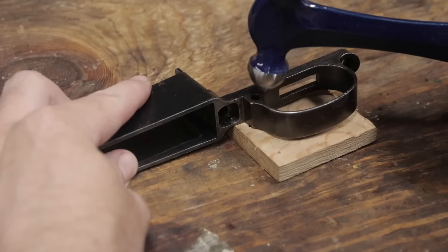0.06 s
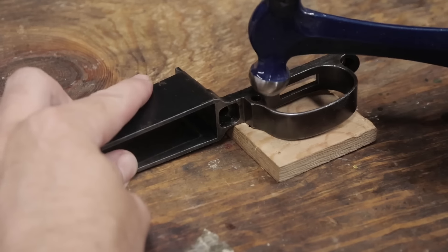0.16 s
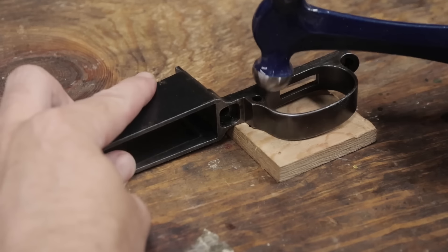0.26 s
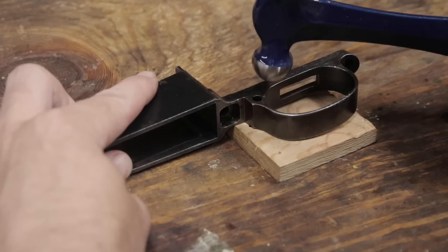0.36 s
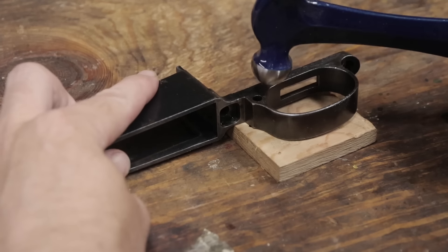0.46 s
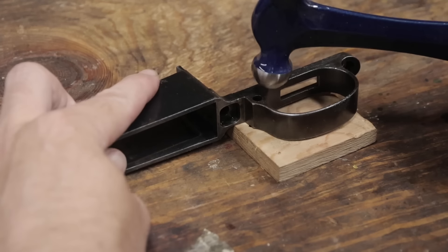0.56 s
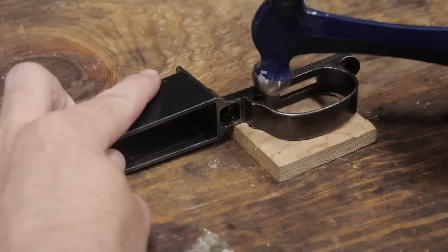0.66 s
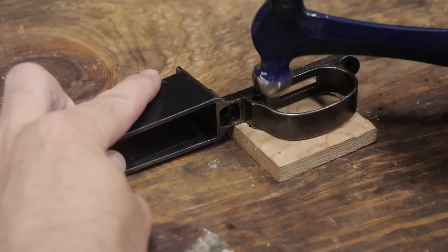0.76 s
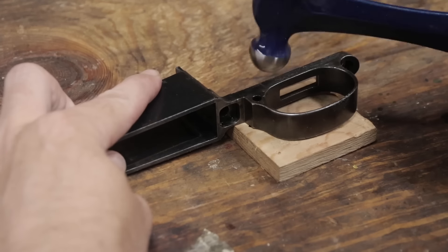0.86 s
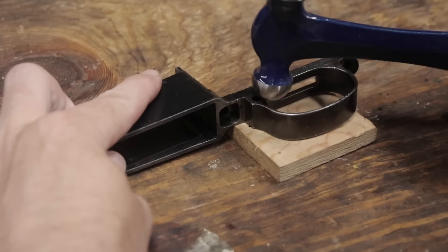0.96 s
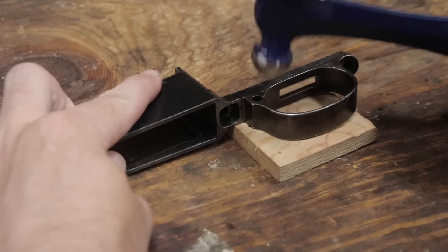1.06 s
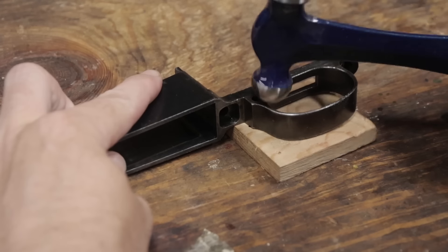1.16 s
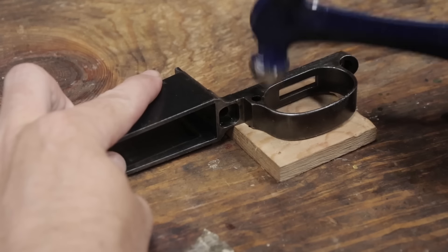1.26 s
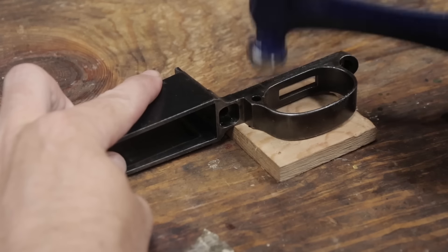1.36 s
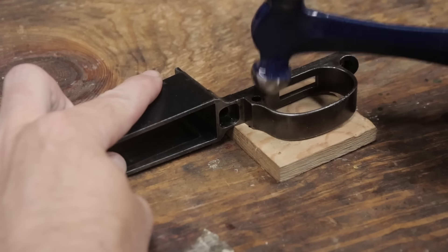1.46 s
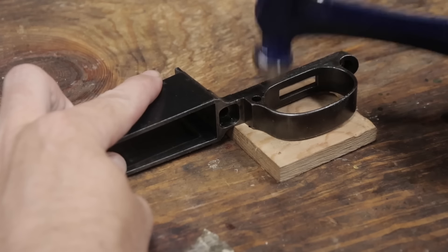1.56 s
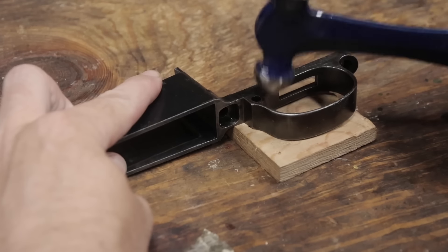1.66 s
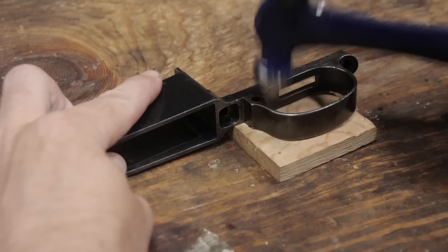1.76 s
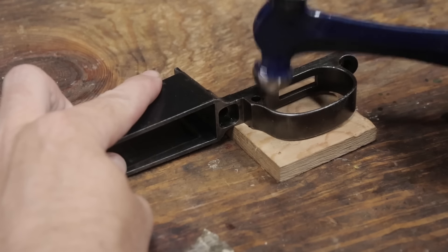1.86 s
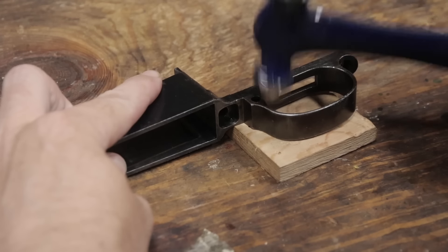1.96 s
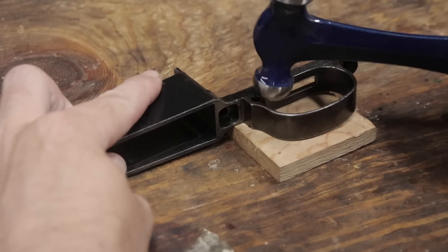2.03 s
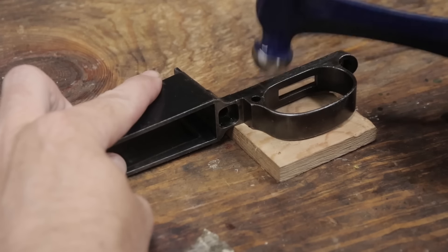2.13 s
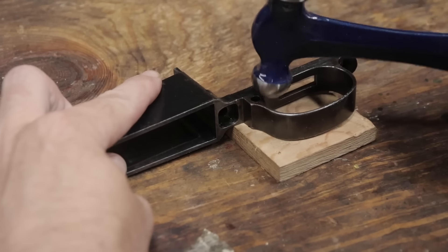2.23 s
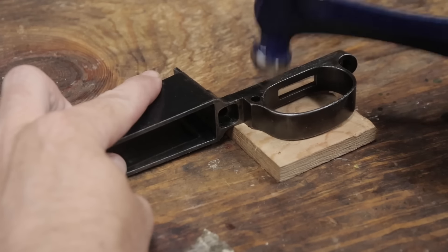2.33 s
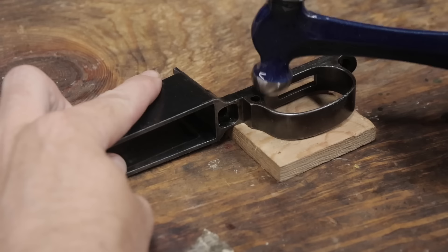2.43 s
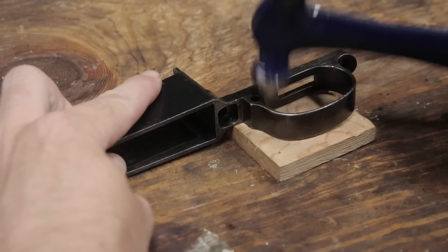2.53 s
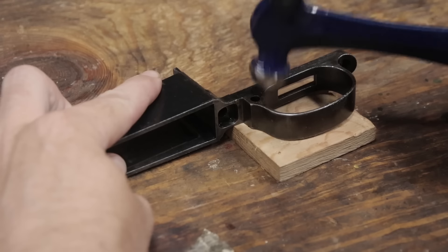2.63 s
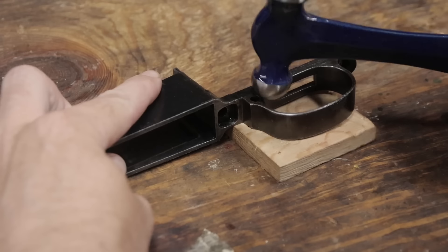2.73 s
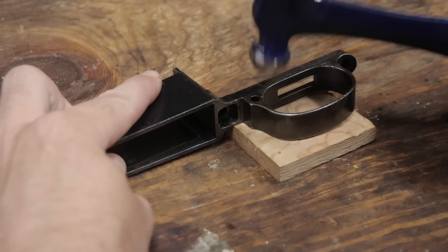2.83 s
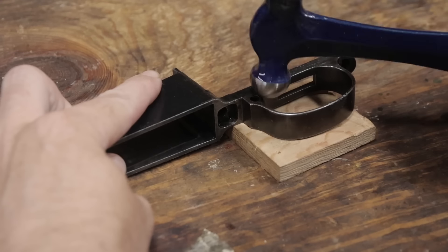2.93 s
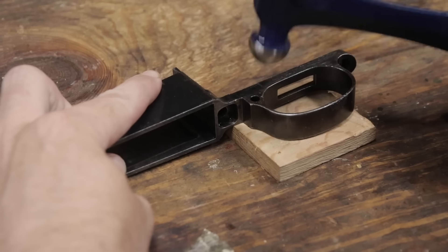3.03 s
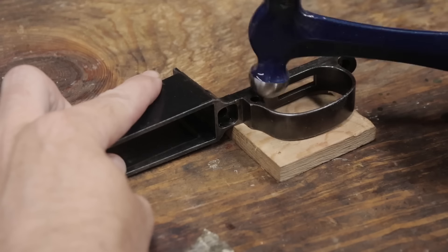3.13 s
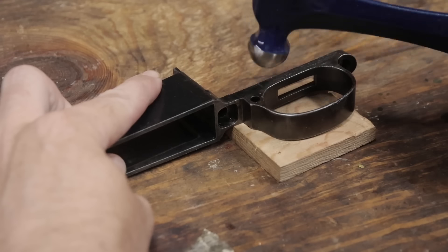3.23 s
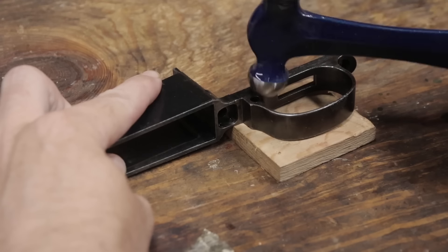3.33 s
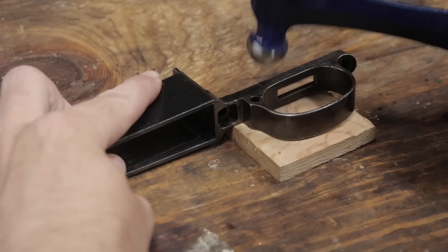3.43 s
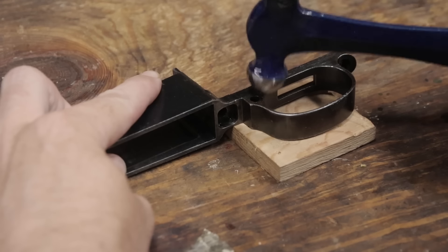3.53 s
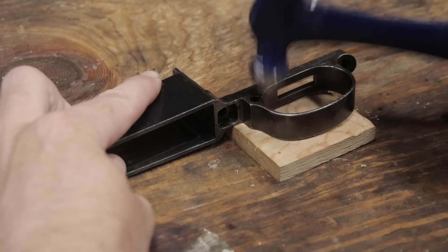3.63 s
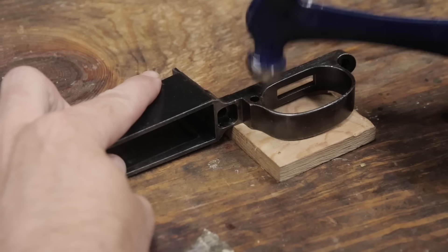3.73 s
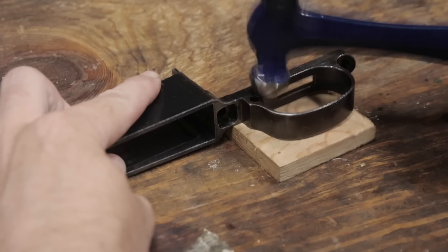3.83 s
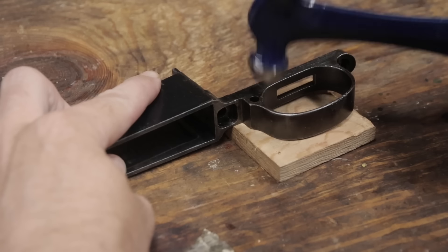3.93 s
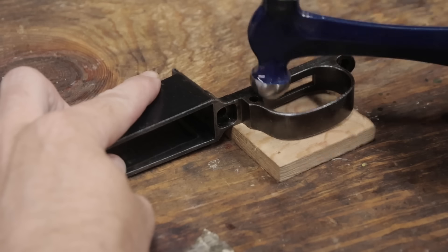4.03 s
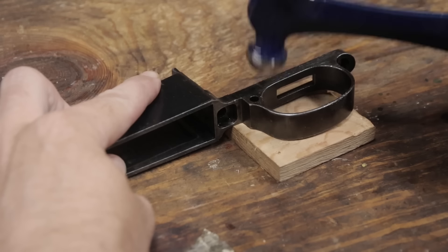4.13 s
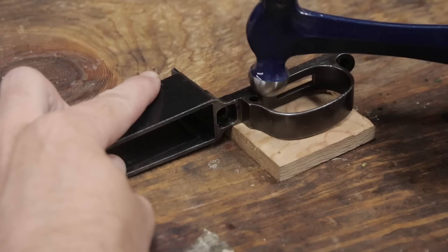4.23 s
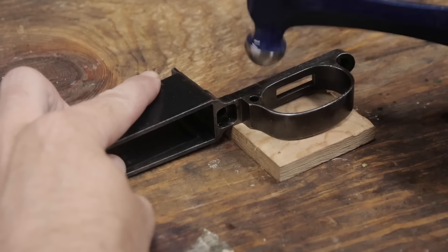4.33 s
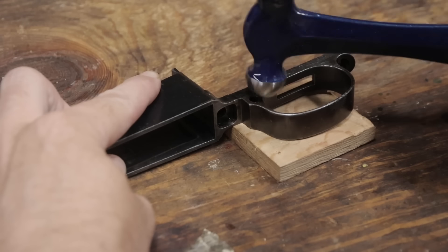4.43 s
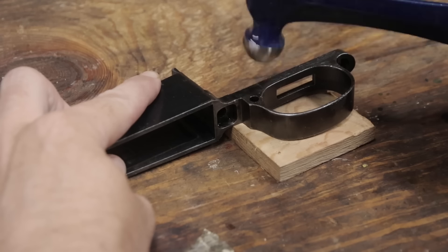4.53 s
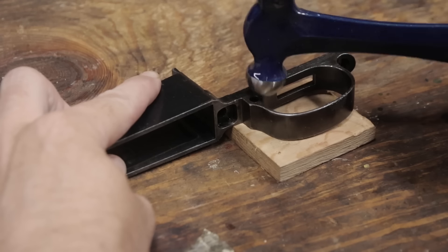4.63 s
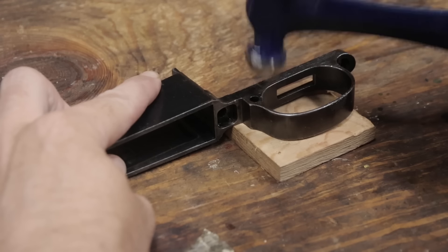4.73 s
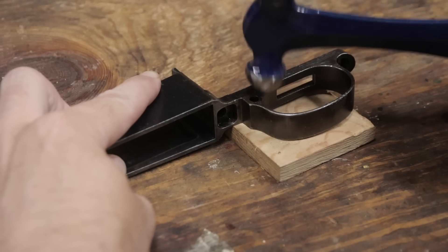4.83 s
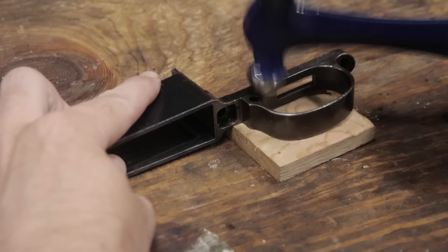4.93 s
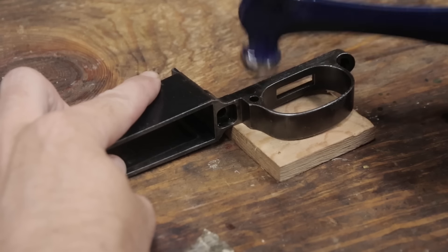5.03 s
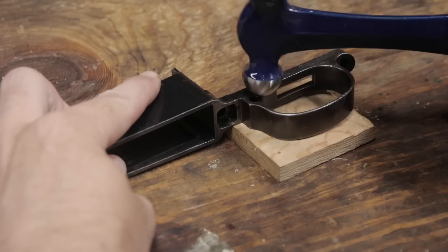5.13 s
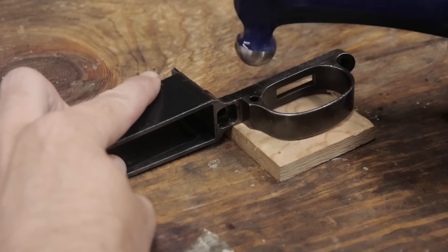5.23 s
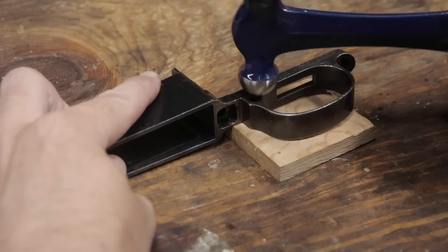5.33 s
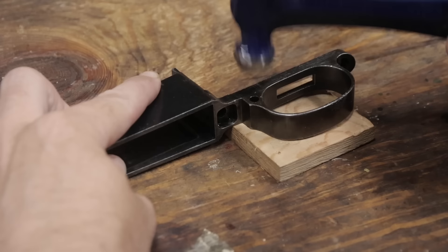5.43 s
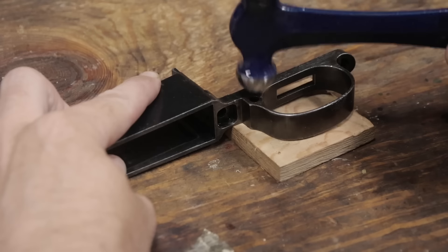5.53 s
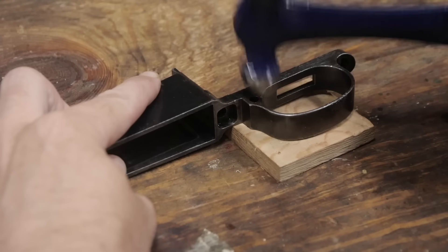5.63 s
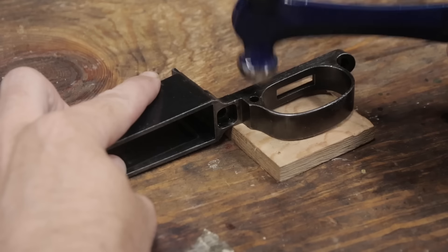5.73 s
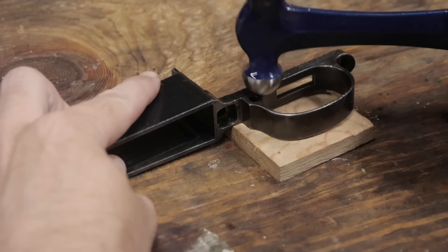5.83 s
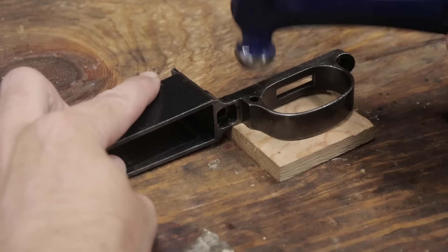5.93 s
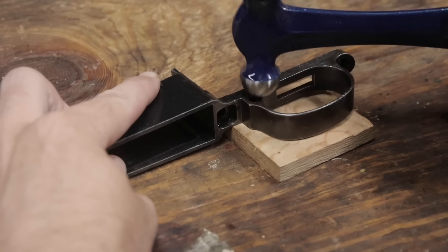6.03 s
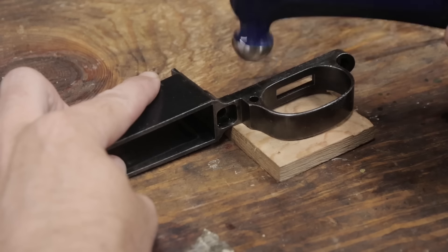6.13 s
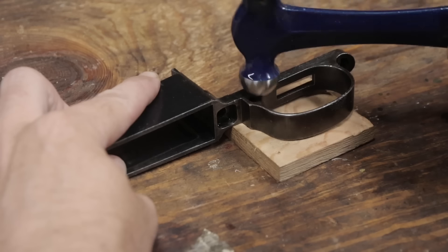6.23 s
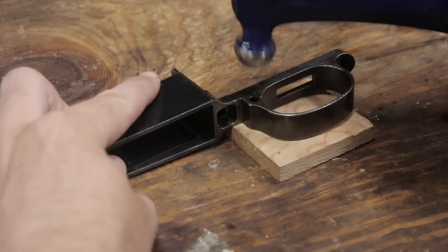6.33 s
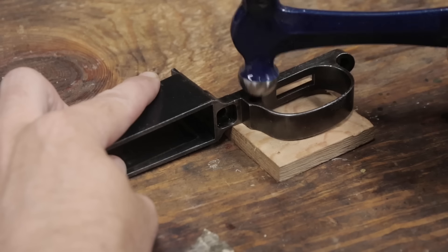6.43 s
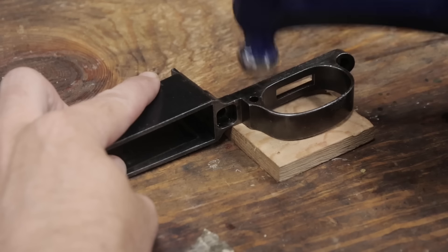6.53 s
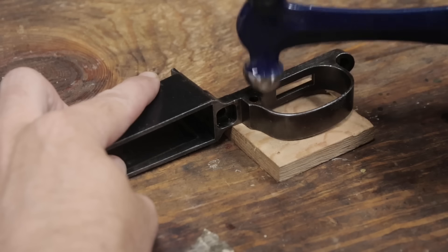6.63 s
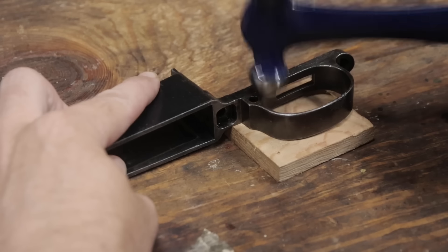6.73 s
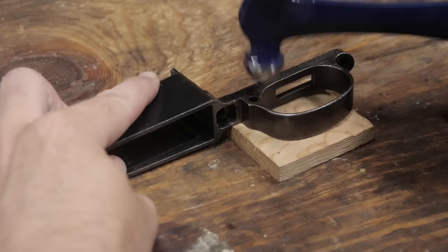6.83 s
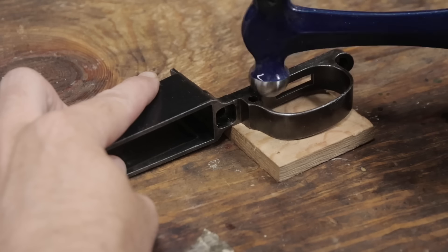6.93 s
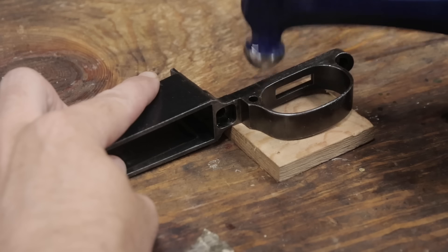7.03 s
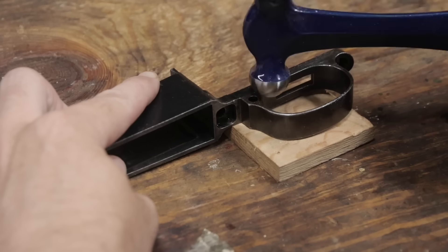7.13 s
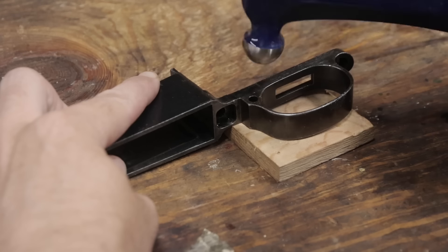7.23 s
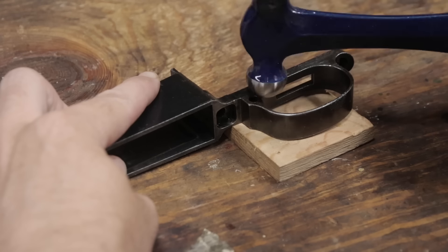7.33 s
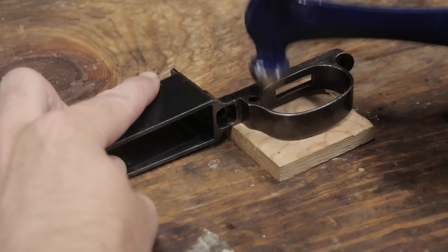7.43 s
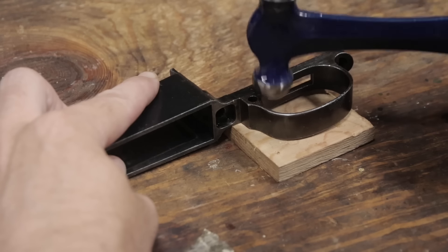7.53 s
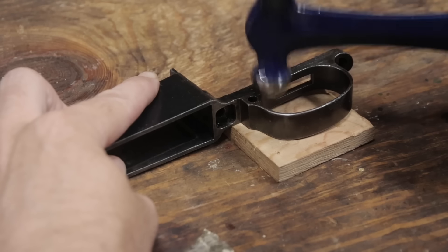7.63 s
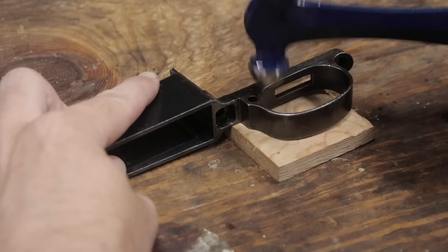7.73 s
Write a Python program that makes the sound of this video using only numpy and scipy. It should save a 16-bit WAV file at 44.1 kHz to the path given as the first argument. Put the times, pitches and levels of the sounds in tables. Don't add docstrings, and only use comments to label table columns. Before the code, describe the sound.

A small hammer taps a steel part on a wood block about five times a second, each hit a dry knock with bright metallic clack.

```python
import sys
import numpy as np
from scipy import signal
from scipy.fft import rfft, irfft
from scipy.io import wavfile
from scipy.ndimage import uniform_filter1d

SR = 44100
rng = np.random.default_rng(int(sys.argv[2]) if len(sys.argv) > 2 else 0)


def unload_wav(signal):
    wavfile.write(
        sys.argv[1],
        SR,
        np.round(np.clip(np.atleast_2d(signal).T, -1, 1) * 32767).astype(np.int16),
    )


def attenuation_scalar(level_db):
    decades = np.asarray(level_db, float) / 20
    return 10 ** decades


N = 343045


def unit(x):
    return x / np.sqrt(np.mean(x ** 2))


def noise():
    return rng.standard_normal(N)


def band(x, lo_hz, hi_hz):
    sos = signal.butter(2, [lo_hz, min(hi_hz, 0.45 * SR)], "band", fs=SR, output="sos")
    return signal.sosfilt(sos, x)


def train(times, sizes):
    out = np.zeros(N)
    index = np.clip((np.asarray(times) * SR).astype(int), 0, N - 1)
    np.add.at(out, index, sizes)
    return out


def place(times, sounds):
    out = np.zeros(N + SR)
    for at, sound in zip((times * SR).astype(int), sounds):
        out[at:at + len(sound)] += sound
    return out[:N]


def mode(force, hz, t60):
    radius = 1000 ** (-1 / (max(t60, 0.003) * SR))
    angle = 2 * np.pi * hz / SR
    return signal.lfilter([0, radius * np.sin(angle)], [1, -2 * radius * np.cos(angle), radius ** 2], force)


def fading(times, sizes, t60):
    return signal.lfilter([1], [1, -1000 ** (-1 / (t60 * SR))], train(times, sizes))


# (frequency [Hz], density [dB per Hz])
AIR_SPECTRUM = [(18, -48.5), (30, -10), (72, 4.5), (161, -21.5), (272, -17), (397, -22.5), (761, -29.5),
                (885, -27.5), (1080, -36.5), (1460, -35.5), (12000, -55), (15600, -86), (22000, -120)]
# (frequency [Hz], bandwidth [Hz], level [dB])
HUM = [(75, 8.7, -66), (855, 21, -82.5)]
AIR_DB = -58.5


def background(s):
    hz, db = np.transpose(AIR_SPECTRUM)
    f = np.maximum(np.fft.rfftfreq(N, 1 / SR), 1)
    colour = attenuation_scalar(np.interp(np.log(f), np.log(hz), db))
    air = attenuation_scalar(AIR_DB - 1.5) * unit(irfft(rfft(noise()) * colour, N))
    hum = sum(attenuation_scalar(db) * unit(band(noise(), c - width / 2, c + width / 2)) for c, width, db in HUM)
    duck = np.minimum(fading(s, np.ones(len(s)), 10.0), 1)
    return (air + hum) * attenuation_scalar(-7 * duck)


# (time [s], level [dB], length [s])
NUDGES = [
    (0.281, -56.5, 0.014),
    (0.295, -57, 0.01),
    (0.34, -64, 0.027),
    (0.779, -64, 0.008),
]


def nudges():
    t = np.arange(SR) / SR
    push = sum(attenuation_scalar(db) * np.exp(-((t - s) / width) ** 2) for s, db, width in NUDGES)
    push = push * rng.standard_normal(SR)
    rub = 0.17 * mode(push, 250, 0.023) + 0.084 * mode(push, 760, 0.017) + 0.0071 * mode(push, 1300, 0.019)
    return np.pad(band(rub, 120, 1500), (0, N - SR))


# (time [s], contact sharpness [dB], lean toward the thin
# wall [dB], hammer ring [dB])
TAPS = [(0.8041, -37.5, 4.5, -80), (1.0475, -39, 15.5, -60), (1.279, -4.5, 3.5, -51),
        (1.514, -17.5, 1.5, -53), (1.7076, -5, 2, -43.5), (1.8984, 0.5, -2.5, -43),
        (2.0926, -20.5, 5, -60), (2.2849, -0.5, -1.1, -49), (2.4801, 1, 1.8, -43.5),
        (2.6634, -12, -3.5, -61.5), (2.841, -0.3, 2.5, -46.5), (3.025, 3.5, 0, -44),
        (3.2161, 1, -3.5, -46.5), (3.4022, -3.5, -0.6, -58), (3.5916, 2.5, -4, -52.5),
        (3.7668, 1.2, -3, -47), (3.9529, 3, 1.3, -44.5), (4.148, 1, 0.5, -53),
        (4.3311, 1.5, 5.5, -48.5),
        (4.5136, 0.8, -1.5, -56), (4.6996, 4, 0.8, -49), (4.8807, 2.5, 3.5, -46),
             (5.0572, -0.5, 1, -61), (5.2336, 1.5, -2, -48.5), (5.4054, 4, 4.5, -63),
             (5.5852, 3, 6.5, -49.5), (5.764, 0, 6.5, -75), (5.9451, 0.6, 3, -62), (6.1274, 2.5, 6, -53),
             (6.317, 2.5, 7, -55), (6.4974, -8, 4, -57.5), (6.6845, -0.7, -5, -55),
             (6.8613, -6.5, 4, -52.5), (7.0437, -3, 4, -49.5), (7.233, -10.5, 0, -53),
             (7.4163, -0.5, 0.5, -52.5), (7.5789, -16.5, 2.5, -50), (7.7619, -23.5, 4, -54)]
# (time [s], level [dB])
EFFORT = [(0.8, -42), (1.05, -26), (1.45, -22), (1.7, -24), (2.7, -24), (3.25, -22), (3.8, -22), (4.3, -24),
          (4.6, -20.5), (5.06, -24), (5.5, -21.5), (5.85, -24), (6.65, -21), (6.87, -26), (7.35, -24.5),
          (7.62, -28)]
CLACK_DB, SPARKLE_DB, SLAP_DB = -30, -36, -16.5
SLAP_PER_SHARP, SLAP_PER_LEAN = 0.55, 0.25


def blows():
    s, sharp_db, lean_db, ring_db = np.transpose(TAPS)
    thump_db = np.interp(s, *np.transpose(EFFORT))
    slap_db = SLAP_DB + SLAP_PER_SHARP * sharp_db + SLAP_PER_LEAN * lean_db
    clack_db = CLACK_DB + sharp_db
    sparkle_db = SPARKLE_DB + sharp_db + lean_db
    return s, slap_db, thump_db, clack_db, sparkle_db, ring_db


# (frequency [Hz], signed swing [amplitude], t60 [s])
WOOD = [(68, 0.031, 0.041), (103, -0.016, 0.16), (123, -0.065, 0.078), (147, 0.02, 0.16),
        (181, -0.133, 0.119), (223, 0.049, 0.138), (242, 0.025, 0.16), (296, 0.058, 0.095),
        (333, 0.072, 0.089), (446, 0.06, 0.106), (475, -0.147, 0.015), (540, 0.07, 0.059),
        (677, -0.085, 0.16), (706, 0.193, 0.03), (823, 0.023, 0.098), (895, 0.056, 0.056),
        (1038, 0.064, 0.092), (1189, 0.095, 0.051), (1222, -0.076, 0.015), (1468, -0.061, 0.02),
        (1586, -0.012, 0.113), (1723, 0.088, 0.068), (1691, -0.098, 0.022), (2145, 0.028, 0.015),
        (2407, -0.025, 0.015), (2578, -0.013, 0.097), (3098, 0.014, 0.136), (3458, -0.026, 0.015)]
REBOUND_S, REBOUND_SHARE = 0.00582, -0.53


def wood(s, slap_db, thump_db):
    hz, swing, t60 = np.transpose(WOOD)[:, :, None]
    t = np.arange(SR // 8) / SR

    def ring(age):
        return swing * np.sin(2 * np.pi * hz * age) * 1000 ** (-age / t60)

    shapes = ring(t) + REBOUND_SHARE * ring(np.maximum(t - REBOUND_S, 0))
    knock_db = 1.01 * (thump_db + 24) + 0.15 * (slap_db + 21.5)
    scatter_db = 1.2 * rng.standard_normal((len(s), len(WOOD)))
    mode_db = np.where(hz.T < 400, thump_db[:, None] + 24.0, knock_db[:, None])
    knocks = attenuation_scalar(mode_db + scatter_db) @ shapes
    contact = np.hanning(9)
    knocks = signal.lfilter(contact / contact.sum(), [1], knocks)
    choked = knocks * np.exp(-(t / 0.042) ** 2)
    thud = knocks * np.exp(-t / 0.006)
    lag, size = rng.random((len(s), 2)).T
    bounce = place(s + 0.018 + 0.01 * lag, attenuation_scalar(-12.0) * size[:, None] * choked)
    slap = fading(s, attenuation_scalar(slap_db - 7.5), 0.026) * unit(band(noise(), 2440, 3780))
    shudder = fading(s + 0.0037, attenuation_scalar(knock_db - 29.5), 0.09) * unit(band(noise(), 286, 1224))
    return place(s, choked) + bounce + slap + shudder, place(s, thud) + slap + shudder


# (frequency [Hz], level [dB], t60 [s])
STEEL_LOW = [(2293, -3, .07), (2508, -3, .07), (2640, -4, .07), (2783, -4, .07), (3030, -4, .07),
             (3100, -1, .08), (3235, -2, .08), (3418, -2, .08), (3671, -6, .07), (3865, -8, .07),
             (4414, -9, .07), (4581, -9, .07), (4904, -9, .07), (5135, -8, .07), (5334, -8, .07),
             (5577, -6, .07), (5964, -6, .07), (6126, -9, .07), (6303, -12, .07)]
# (frequency [Hz], level [dB], t60 [s])
STEEL_HIGH = [(7650, -10, .07), (8263, -6, .07), (8780, 0, .07), (9232, -6, .06), (9377, -2, .08),
              (9566, -4, .09), (10034, -3, .08), (10368, -11, .12), (11057, -10, .12), (11590, -8, .07),
              (12419, -8, .09), (14911, -21, .06)]
MODES_DB = -9.5
HELD = 0.81


def steel(s, level_db, modes, crack_hz, crack_s, chatter_s):
    chatter = fading(s, attenuation_scalar(level_db), chatter_s) * noise() / np.sqrt(chatter_s * SR / 14)
    rings = sum(attenuation_scalar(db) * mode(chatter, hz, HELD * t60) for hz, db, t60 in modes)
    crack = fading(s, attenuation_scalar(level_db), crack_s) * unit(band(noise(), *crack_hz))
    return attenuation_scalar(MODES_DB) * rings + crack


RING_HZ, RING_T60_S = 3549, 0.47


def hammer(s, ring_db):
    t = np.arange(N) / SR
    last = np.searchsorted(s, t) - 1
    age = t - s[last]
    level = attenuation_scalar(ring_db[last] - 60 * np.abs(age) / RING_T60_S)
    return (last >= 0) * np.sqrt(2) * level * np.sin(2 * np.pi * RING_HZ * age)


# (frequency [Hz], level [dB], time to the top [s])
SWAY = [(151.4, -37.5, 0.045), (660, -38, 0.031)]


def sway(s, thump_db):
    t = np.arange(SR // 4) / SR
    out = 0
    for hz, db, top in SWAY:
        detune, scatter = rng.standard_normal((len(s), 2)).T[:, :, None]
        swell = (t / top) ** 3 * np.exp(3 * (1 - t / top))
        level = attenuation_scalar(db + thump_db[:, None] + 18.5 + 4.1 * scatter)
        out = out + level * swell * np.sin(2 * np.pi * hz * (1 + 0.014 * detune) * t)
    return place(s, out)


# (frequency [Hz], level [dB], t60 [s])
ROOM = [(64.5, 7, 0.5), (111, 0, 0.29), (174.5, -3, 0.23), (326, -5.5, 0.11), (460, -1, 0.23),
        (651, -9, 0.065), (1360, -17.5, 0.29), (2360, -4, 0.18), (3680, -10.5, 0.22), (5900, -13.5, 0.22),
        (7800, -15, 0.18), (12200, -31.5, 0.18)]
BUILD_LOW_S, BUILD_HIGH_S = 0.022, 0.0056


def workshop(x):
    t = np.arange(SR // 2) / SR
    echo = 0
    for hz, db, t60 in ROOM:
        lo_hz, hi_hz = hz / np.sqrt(2), hz * np.sqrt(2)
        build = 1 - np.exp(-(t / (BUILD_LOW_S if hz < 2000 else BUILD_HIGH_S)) ** 2)
        tail = band(rng.standard_normal(len(t)), lo_hz, hi_hz) * 1000 ** (-t / t60) * build
        echo = echo + attenuation_scalar(db) * tail / np.sqrt(np.sum(tail ** 2) * SR / 2 / lo_hz)
    return signal.fftconvolve(x, echo)[:N]


def scene():
    s, slap_db, thump_db, clack_db, sparkle_db, ring_db = blows()
    s = s + 0.001072
    air = background(s)
    rub = nudges()
    knock, thud = wood(s, slap_db, thump_db)
    clack = steel(s, clack_db + 1.0, STEEL_LOW, (5000, 6600), crack_s=0.047, chatter_s=0.0054)
    sparkle = steel(s, sparkle_db + 7, STEEL_HIGH, (7000, 11500), crack_s=0.0067, chatter_s=0.013)
    rest = clack + sparkle + rub
    mono = knock + sway(s, thump_db) + rest + workshop(thud + rest) + hammer(s, ring_db) + air
    return np.array([mono, mono])


def roll_off(x):
    return signal.sosfilt(signal.butter(12, 16490, fs=SR, output="sos"), x)


CLIP = 0.31
TOP_HZ, FINAL_TOP_HZ = 15700, 16350


def record(dry):
    x = dry / (1 + np.abs(dry / CLIP) ** 6) ** (1 / 6)
    x = signal.sosfilt(signal.ellip(6, 0.2, 50, TOP_HZ, fs=SR, output="sos"), x)
    x = signal.sosfilt(signal.butter(4, 48.0, "high", fs=SR, output="sos"), x)
    treble = signal.sosfiltfilt(signal.butter(4, 4500, "high", fs=SR, output="sos"), x)
    envelope = np.sqrt(uniform_filter1d(treble ** 2, size=260) + 1e-14)
    rising = envelope > 4 * np.roll(envelope, 330, axis=1)
    attack = uniform_filter1d(1.0 * rising, size=64)
    hiss = band(band(rng.standard_normal(x.shape), 4300, 15000), 4500, 10000)
    grit = envelope * unit(hiss)
    smear = 0.4 * attack * (grit - treble)
    x = signal.sosfilt(signal.ellip(10, 0.2, 70, FINAL_TOP_HZ, fs=SR, output="sos"), x + smear)
    return roll_off(x)


dry = scene()
out = record(dry)
unload_wav(out)
```